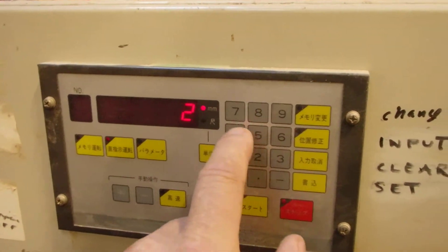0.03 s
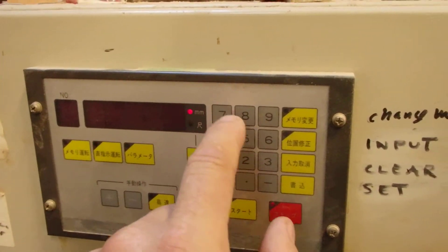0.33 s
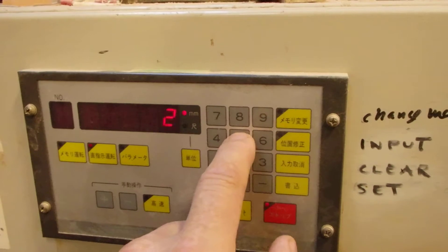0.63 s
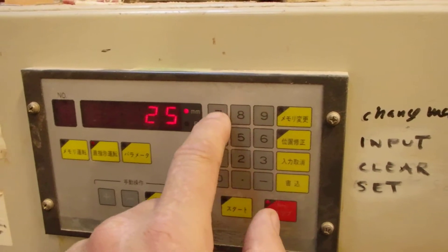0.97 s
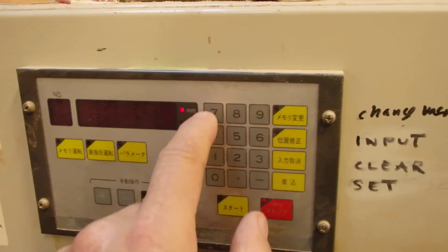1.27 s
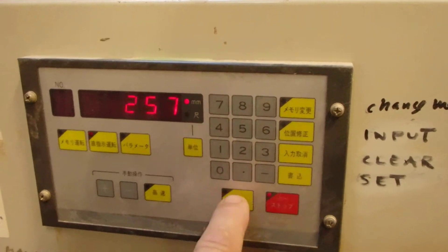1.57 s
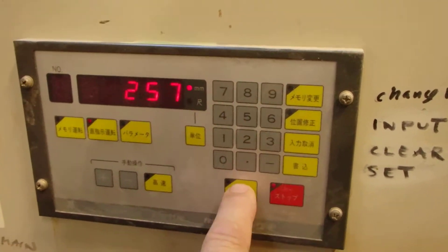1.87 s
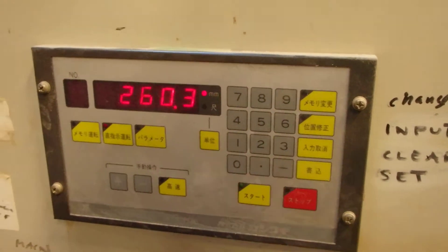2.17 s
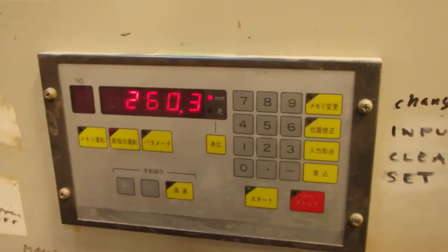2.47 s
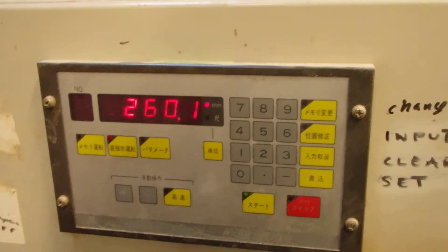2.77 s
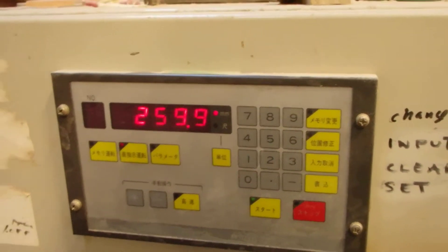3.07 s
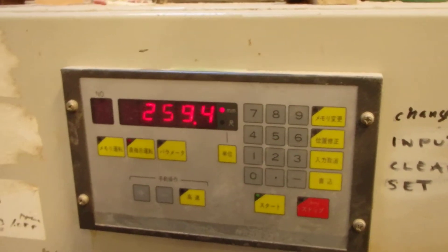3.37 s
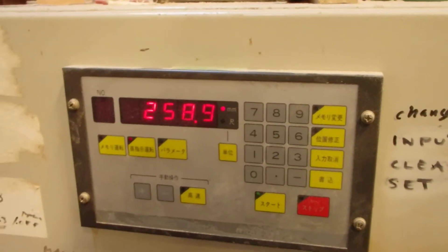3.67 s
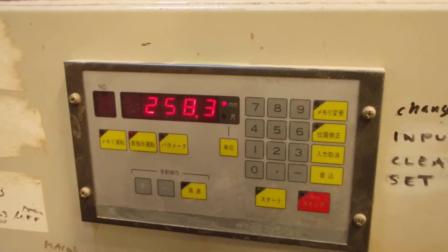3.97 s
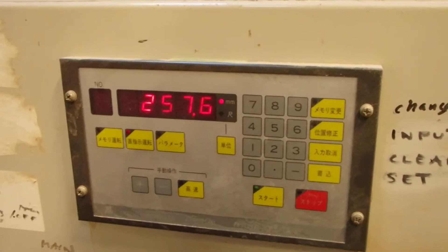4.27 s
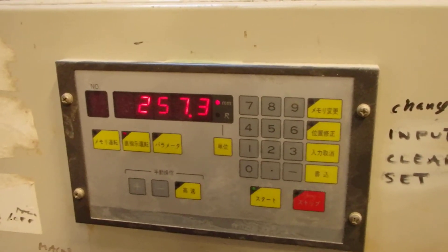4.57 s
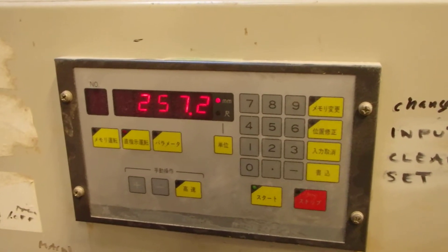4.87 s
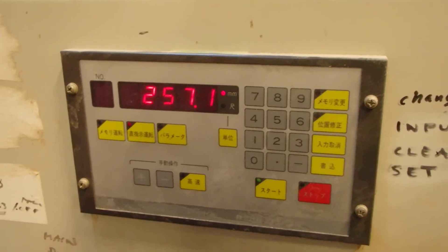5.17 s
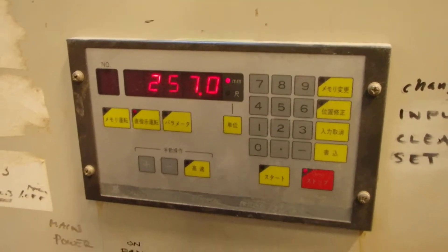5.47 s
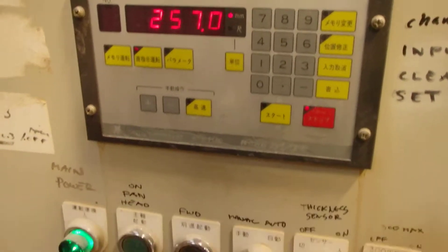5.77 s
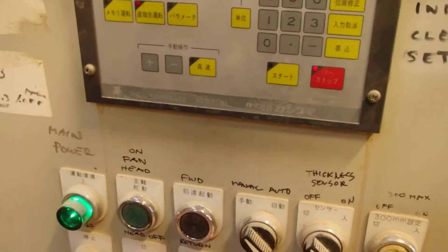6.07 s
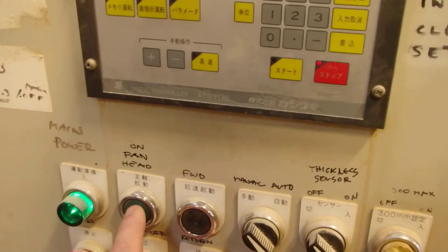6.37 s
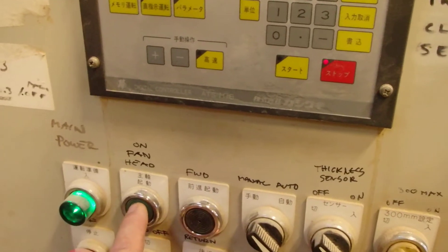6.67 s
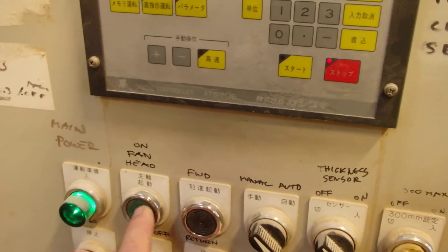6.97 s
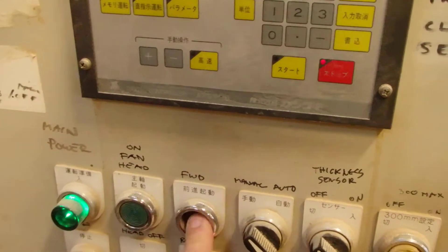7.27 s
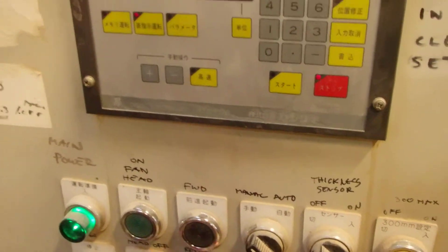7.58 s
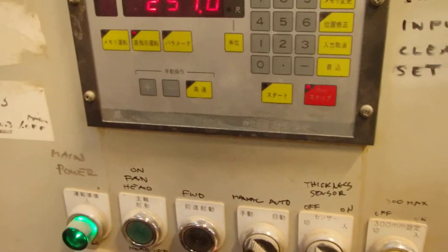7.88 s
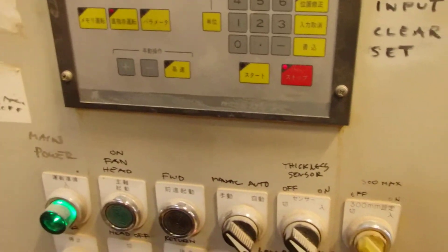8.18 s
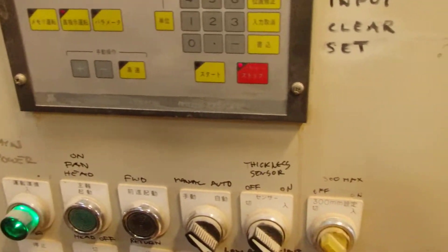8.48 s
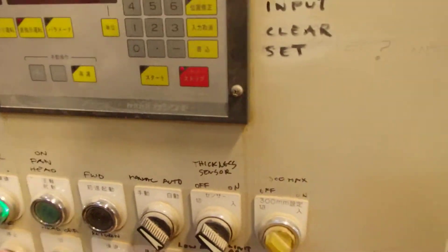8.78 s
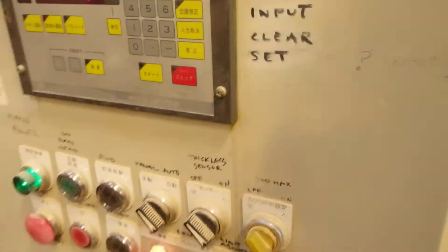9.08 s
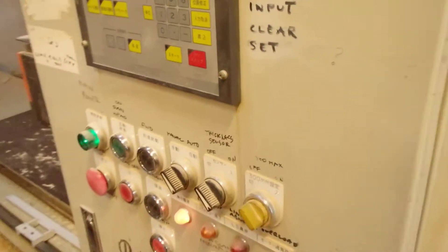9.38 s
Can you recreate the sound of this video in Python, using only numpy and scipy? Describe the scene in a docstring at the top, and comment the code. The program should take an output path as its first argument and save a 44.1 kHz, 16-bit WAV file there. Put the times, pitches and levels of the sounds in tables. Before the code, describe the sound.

Close to the controls of a workshop planer, a loud droning tone with buzzy overtones runs throughout, backed by churning air and motor hum. A short cluster of switch clacks leads into a quieter, high whine from the height motor, which soon stops. A tiny button squeak and another clack follow, with faint ticks scattered about. As the microphone moves to the side, the drone turns fuller and buzzier.

```python
"""The three-knife cutterhead of an idling thickness planer chops the air like a siren: a loud tone
with a buzz of overtones, whose colour changes as the listener moves through the standing waves.
Churned air roars in the resonant hood, the drive hums, and the table motor whines as it sets the
height. Switchgear clacks, a finger squeaks on a button and faint ticks sound now and then.
The level often dips briefly, and the sound skips once."""
import sys
import numpy as np
from scipy import signal
from scipy.fft import rfft, irfft
from scipy.io import wavfile
from scipy.ndimage import uniform_filter1d

SR = 44100
rng = np.random.default_rng(int(sys.argv[2]) if len(sys.argv) > 2 else 0)


def digitize_waveform(pressure):
    """Quantize a signal to 16-bit integers and store it at the path in sys.argv[1].

    Rows of a 2-D input are taken as channels; values are limited to [-1, 1].
    """
    field = np.atleast_2d(pressure).T
    bounded = np.clip(field, -1, 1)
    quanta = np.round(bounded * 32767).astype(np.int16)
    wavfile.write(sys.argv[1], SR, quanta)


N = 424241
TIME = np.arange(N) / SR
FREQS = np.maximum(np.fft.rfftfreq(N, 1 / SR), 1)


def cutterhead(phase, place, tone_db=-6, buzz_db=-0.46, waver_db=0.2, flutter_rad=0.061, throb_db=0.66):
    """Siren principle: knives chop the air at the table lip, giving a tone and its harmonics."""
    # overtones of the knife tone at each of five listening spots: multiple, relative_level_db
    at_keypad = [(2, -33.5), (3, -31.5), (4, -30), (5, -29.5), (6, -21.5), (7, -26.5), (8, -35.5), (9, -27),
                 (10, -44), (11, -27), (12, -45), (13, -43.5), (14, -42.5), (15, -40), (16, -47), (17, -49)]
    at_display = [(2, -35), (3, -34.5), (4, -30), (5, -26.5), (6, -27), (7, -27), (8, -30.5), (9, -25),
                  (10, -36), (11, -26.5), (12, -42), (13, -41.5), (14, -41.5), (15, -42), (16, -44),
                  (17, -47)]
    at_panel = [(2, -34.5), (3, -36), (4, -30.5), (5, -24.5), (6, -27), (7, -34), (8, -32), (9, -26),
                (10, -33), (11, -26), (12, -44), (13, -39.5), (14, -39), (15, -40), (16, -42), (17, -47)]
    at_buttons = [(2, -31.5), (3, -35.5), (4, -30), (5, -29.5), (6, -19.5), (7, -29.5), (8, -38),
                  (9, -22.5), (10, -34), (11, -34.5), (12, -40.5), (13, -41.5), (14, -40), (15, -42),
                  (16, -44), (17, -47)]
    at_side = [(2, -22.5), (3, -30.5), (4, -28), (5, -27.5), (6, -18.5), (7, -22), (8, -40.5), (9, -26.5),
               (10, -35.5), (11, -33.5), (12, -39)]
    spots = [dict(spot) for spot in (at_keypad, at_display, at_panel, at_buttons, at_side)]
    tone = undb(tone_db + throb_db * walk(24)) * np.sin(phase)
    for multiple, display_db in at_display:
        spot_db = [spot.get(multiple, display_db) for spot in spots]
        local_db = np.interp(place, np.arange(len(spots)), spot_db) + standing_wave(multiple)
        # eddies in the gap shake each overtone in phase and level
        shake = 2 * np.pi * rng.random() + flutter_rad * walk(45)
        level_db = tone_db + buzz_db + local_db + waver_db * walk(4.5)
        tone += undb(level_db) * np.sin(multiple * phase + shake)
    return np.sqrt(2) * tone


def standing_wave(multiple):
    """Interference: an overtone fades at a node and swells at an antinode. Returns its gain in dB."""
    # nodes and antinodes that the listener crosses: centre_s, multiple, gain_db, half_width_s
    crossings = [(4.85, 6, 4, 0.28), (8.55, 2, -5.5, 0.13), (8.8, 3, -8.5, 0.51), (8.8, 8, 10.5, 0.39),
                 (8.8, 6, 1, 0.67), (8.92, 5, -9, 0.12), (9.13, 7, -9, .07), (9.2, 9, -9, 0.071),
                 (9.55, 9, 6, 0.1), (9.62, 4, -15, 0.13), (9.62, 6, -8, .11)]
    return sum(gain_db * np.exp(-((TIME - centre_s) / half_width_s) ** 2)
               for centre_s, k, gain_db, half_width_s in crossings if k == multiple)


def churned_air(phase, place, knife_pulse=0.05, flicker_db=0.54, crossover_hz=1500):
    """Turbulence, pulsing a little with each knife, excites the resonances of the hood."""
    # spectrum of the turbulence: frequency_hz, density_db
    turbulence = [(20, -72.5), (60, -66), (100, -59.5), (135, -50.5), (250, -54.5), (380, -61),
                  (550, -66.5), (1100, -64.5), (2550, -63), (3020, -72), (4000, -72), (4550, -85),
                  (6000, -82.5), (7000, -87.5), (9500, -91.5), (11400, -98.5), (13200, -106)]
    # resonances of the hood and housing: centre_hz, width_hz, boost_db
    hood_modes = [(168.2, 32, 8.5), (315.6, 27, 8), (2787, 220, 8.5), (3660, 450, 8.5), (5120, 450, 7),
                  (8760, 1100, 6.5)]
    # likeness of the air noise at the two microphone ports: frequency_hz, correlation
    likeness = [(100, 0.96), (400, 1), (1100, .93), (1900, 0.8), (3400, 0.28), (8000, 0.3)]
    # strength of the hiss at each listening spot: gain_db
    spot_hiss = [-0.38, 0.57, 0.59, -0.48, -0.18]
    hood_db = sum(boost_db / (1 + 2 * ((FREQS - centre_hz) / width_hz) ** 2) ** 2
                  for centre_hz, width_hz, boost_db in hood_modes)
    density = undb(spectrum(turbulence) + hood_db) * np.sqrt(SR / 2)
    correlation = spectrum(likeness)
    eddies = rng.standard_normal((2, N)) * (1 + knife_pulse * np.cos(phase))
    mid = shape(eddies[0], density * np.sqrt((1 + correlation) / 2))
    side = shape(eddies[1], density * np.sqrt((1 - correlation) / 2))
    roar = np.array([mid + side, mid - side])
    # the rumble is the same everywhere, the hiss depends on the spot
    rumble = shape(roar, 1 / (1 + (FREQS / crossover_hz) ** 2))
    hiss_db = np.interp(place, np.arange(len(spot_hiss)), spot_hiss) + flicker_db * walk(25)
    return rumble + (roar - rumble) * undb(hiss_db)


def drive(waver_db=2.5):
    """Rotation gives a line spectrum: motor and shafts hum at steady pitches, wavering in level."""
    # partials of the hum: pitch_hz, level_db
    partials = [(58.9, -47), (82.3, -48), (164.6, -35.5), (352, -48.5), (470.8, -52), (634.7, -53),
                (658.3, -55)]
    hum = np.zeros(N)
    for pitch_hz, level_db in partials:
        amplitude = undb(level_db + waver_db * walk(3))
        hum += amplitude * np.sin(2 * np.pi * (pitch_hz * TIME + rng.random()))
    return np.sqrt(2) * hum


def table_motor(pitch_hz=1930.3, octave_db=-12, waver_db=1.0):
    """Periodic vibration: the height motor whines with its octave and eases before its last creep."""
    # envelope of the whine: time_s, level_db
    envelope = [(2.3, -70), (2.42, -37), (3.2, -35.5), (4.0, -39), (4.55, -36), (4.68, -46), (4.8, -37),
                (5.36, -37), (5.48, -70)]
    phase = 2 * np.pi * pitch_hz * TIME
    whine = np.sin(phase) + undb(octave_db) * np.sin(2 * phase)
    return np.sqrt(2) * undb(curve(envelope) + waver_db * walk(8.3)) * whine


def switchgear(attack_s=0.0024):
    """Impact and damping: keys and contactors set the steel cabinet in a dense, decaying rattle."""
    # blows of the keys and contactors: start_s, level_db, t60_s
    clacks = [(1.728, -39, .2), (1.754, -35, .24), (1.789, -41, .25), (1.89, -42, .3), (2.343, -38, .17),
              (4.749, -35.5, .12), (4.785, -42, .1), (7.95, -44, .06), (8.039, -37.5, .11)]
    # spectrum of the rattle: frequency_hz, gain_db
    colour = [(500, -20), (1500, 0), (3700, 2), (4550, -10), (5700, 1), (6700, -6), (7600, 2), (8400, -7),
              (11500, -14), (13000, -27), (15000, -34)]
    envelope = np.zeros(N)
    for start_s, level_db, t60_s in clacks:
        age_s = np.maximum(TIME - start_s, 0)
        attack = 1 - np.exp(-age_s / attack_s)
        decay = undb(-60 * np.minimum(age_s / t60_s, 10))
        envelope += undb(level_db) * attack * decay
    rattle = shape(rng.standard_normal(N), undb(spectrum(colour)))
    return envelope * rattle / rattle.std()


def finger_squeak(pitch_hz=7680, wobble_hz=45):
    """Stick-slip friction: skin on a button gives a thin, unsteady tone."""
    # envelope of the squeak: time_s, level_db
    envelope = [(7.3, -75), (7.36, -56), (7.48, -58), (7.58, -75)]
    phase = 2 * np.pi * np.cumsum(pitch_hz + wobble_hz * walk(180)) / SR
    return np.sqrt(2) * undb(curve(envelope)) * np.sin(phase)


def ticks(cutoff_hz=7000):
    """Impulses have a broad spectrum: low-passed, they make faint, dry ticks a little to the left."""
    # single impulses: time_s, strength_db
    events = [(.619, -13), (.847, -22), (1.770, -24), (2.295, -22), (3.29, -23), (6.0, -22), (6.47, -24),
              (7.42, -25), (7.6, -20), (8.465, -23), (9.132, -23), (9.427, -26)]
    impulses = np.zeros(N)
    for time_s, strength_db in events:
        impulses[int(time_s * SR)] = undb(strength_db)
    softened = shape(impulses, 2 / (1 + 1j * FREQS / cutoff_hz))
    return np.outer([1, 0.6], softened)


def level_dips(fall_s=0.005, recover_db_per_s=12):
    """Amplitude modulation: a gain that drops abruptly, then climbs back at one steady rate."""
    # brief dips in level: start_s, depth_db
    dips = [(0.255, 1.6), (0.848, 2.6), (1.3, 1.6), (1.59, 1.6), (2.13, 1.6), (2.296, 2.4), (2.805, 2.2),
            (3.29, 1.5), (3.545, 2.0), (3.665, 2.6), (4.065, 2.0), (4.32, 2.3), (4.645, 1.7), (5.445, 2.2),
            (5.715, 2.4), (6.19, 2.2), (6.47, 2.2), (6.67, 2.9), (6.98, 2.1), (7.21, 1.5), (7.425, 2.0),
            (7.602, 2.0), (7.84, 2.1), (8.055, 2.8), (8.335, 1.6), (8.467, 2.1), (8.78, 1.9), (9.133, 2.0),
            (9.2, 3.1), (9.428, 3.1)]
    gain_db = np.zeros(N)
    for start_s, depth_db in dips:
        age_s = TIME - start_s
        onset = np.clip(age_s / fall_s, 0, 1)
        gain_db = np.minimum(gain_db, onset * (recover_db_per_s * age_s - depth_db))
    return undb(gain_db)


def microphone_ports(left, right, lag_s=7e-5):
    """Time and level cues: the left port hears the machine sooner and takes far more treble."""
    # balance of the two ports: frequency_hz, left_over_right_db
    balance = [(150, -1.33), (1300, -1.5), (2400, 0), (2750, 2), (3050, 0), (3700, 10), (4600, 1.5),
               (5050, 25.5), (7000, 11.5), (8700, 19.5), (11000, 14.5), (14000, 1.5)]
    tilt = undb(spectrum(balance))
    delay = np.exp(-2j * np.pi * FREQS * lag_s)
    return np.array([shape(left, 2 * tilt / (1 + tilt)), shape(right, 2 * delay / (1 + tilt))])


def limiter(x, ceiling_db=0.0, recover_db_per_s=12):
    """Peak limiting: the gain drops at once under any peak above the ceiling and creeps back."""
    peak_db = 20 * np.log10(np.abs(x).max(axis=0) + 1e-9)
    allowed_db = np.minimum(0, ceiling_db - peak_db)
    creep_db = recover_db_per_s * TIME
    return x * undb(np.minimum.accumulate(allowed_db - creep_db) + creep_db)


def undb(db):
    """Decibels to amplitude ratio."""
    return 10 ** (np.asarray(db) / 20)


def curve(rows):
    """Linear interpolation of rows (time_s, value)."""
    return np.interp(TIME, *np.transpose(rows))


def spectrum(rows):
    """Interpolation of rows (frequency_hz, value) on a log-frequency axis."""
    frequency_hz, value = np.transpose(rows)
    return np.interp(np.log(FREQS), np.log(frequency_hz), value)


def shape(x, gain):
    """Linear filtering: each frequency is multiplied by its gain."""
    return irfft(rfft(x) * gain, N)


def walk(rate_hz):
    """Random modulation: levels held for 1 / rate_hz seconds and smoothed twice; spread near 1."""
    hold = int(SR / rate_hz)
    steps = np.repeat(rng.standard_normal(N // hold + 1), hold)[:N]
    return 1.244 * uniform_filter1d(uniform_filter1d(steps, hold), hold)


def scene(knife_hz=246.87, wander_hz=0.042, background_db=0.61):
    """Superposition: the sources add at a listener who moves along the steadily running machine."""
    # the listener's path: time_s, spot (0 keypad, 1 display, 2 panel, 3 buttons, 4 side)
    path = [(0, 0), (1.7, 0), (2.4, 1), (3.2, 1), (3.8, 2), (5.45, 2), (5.9, 3), (8.8, 3), (9.35, 4)]
    place = curve(path)
    phase = 2 * np.pi * np.cumsum(knife_hz + wander_hz * walk(1.5)) / SR
    background = churned_air(phase, place) + drive() + table_motor() + switchgear() + finger_squeak()
    machine = cutterhead(phase, place) + undb(background_db) * background
    left, right = machine * level_dips()
    return microphone_ports(left, right) + ticks()


def record(dry, skip_at_s=0.619, skip_delay_s=0.0011, cutoff_hz=15700):
    """Peak and band limiting, with one skip: a jump in phase that is heard as a soft pop."""
    limited = limiter(dry)
    delayed = np.roll(limited, int(skip_delay_s * SR), axis=1)
    after_skip = (np.arange(N) > int(skip_at_s * SR)).astype(float)
    crossfade = uniform_filter1d(after_skip, size=40)
    skipped = (1 - crossfade) * limited + crossfade * delayed
    low_pass = signal.ellip(8, rp=0.1, rs=70, Wn=cutoff_hz, fs=SR, output="sos")
    return signal.sosfilt(low_pass, skipped)


dry = scene()
out = record(dry)
digitize_waveform(out)
```